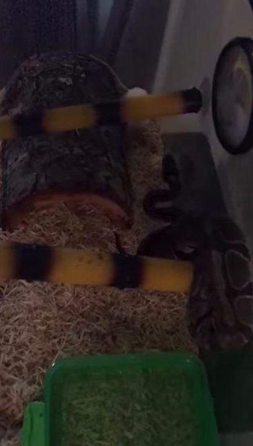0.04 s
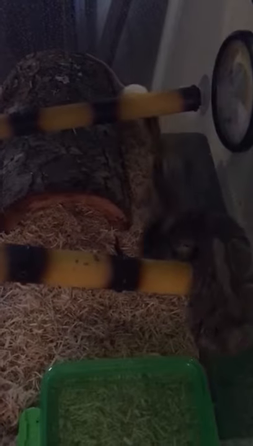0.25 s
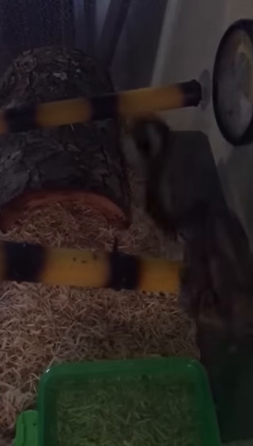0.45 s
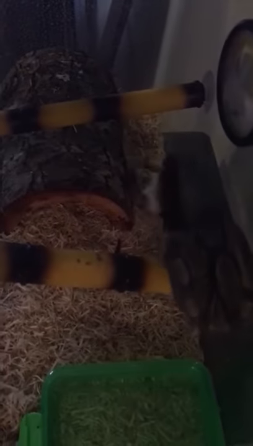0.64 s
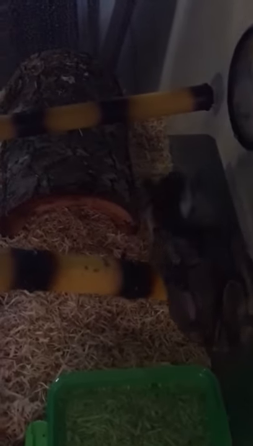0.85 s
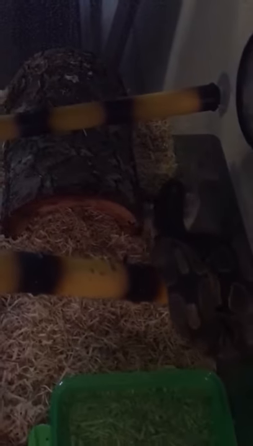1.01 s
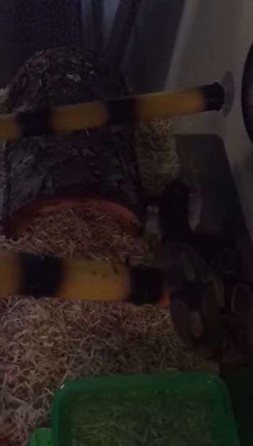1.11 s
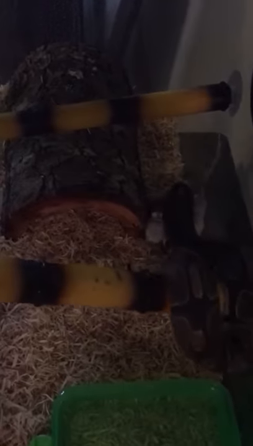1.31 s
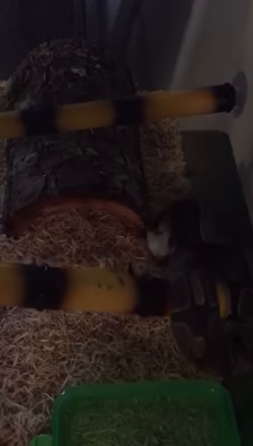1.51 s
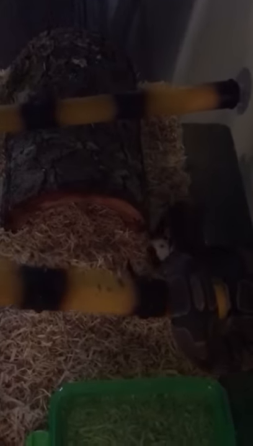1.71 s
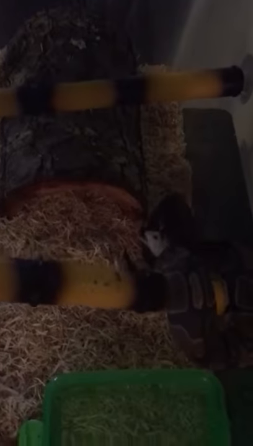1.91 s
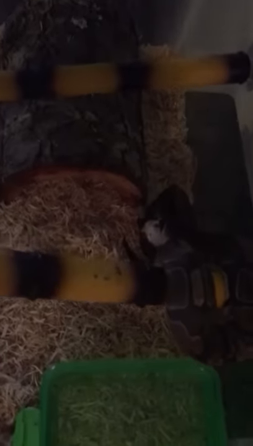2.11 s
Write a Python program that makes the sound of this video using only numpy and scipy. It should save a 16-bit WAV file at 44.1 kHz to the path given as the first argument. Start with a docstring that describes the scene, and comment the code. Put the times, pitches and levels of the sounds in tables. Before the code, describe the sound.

A snake scuffles with a small rodent in a tank, with thumps, knocks and a squeak.

```python
"""A dull thump comes first: a snake strikes at a small rodent and lands on the floor of its tank.
The struggle knocks against the walls and the hide, and the seized rodent yelps and squeaks.
Wood shavings rustle and snap under the dragging body, then settle as the coils tighten.
One microphone, close to the tank, in a quiet room with a low rumble."""
import sys
import numpy as np
from scipy import signal
from scipy.fft import rfft, irfft, next_fast_len
from scipy.io import wavfile

SR = 44100
rng = np.random.default_rng(int(sys.argv[2]) if len(sys.argv) > 2 else 0)


def generate_wav(sig):
    """Save sig (samples, or channels by samples) to the path in sys.argv[1] as 16-bit PCM at SR."""
    pcm = np.round(np.clip(np.atleast_2d(sig).T, -1, 1) * 32767).astype(np.int16)
    wavfile.write(sys.argv[1], SR, pcm)


N = 94815
T = np.arange(N) / SR
CUTOFF_HZ = 10450

# The body landing on the padded tank floor, up close: t/s, level/dB, f/Hz, swell/s
BODY_LANDINGS = [(0.2010, -23, 208, 0.0071), (0.256, -32, 196, 0.0035), (0.271, -29.5, 201, 0.0085),
                 (0.288, -33, 183, 0.009), (0.318, -41.5, 164, 0.0079), (0.368, -46, 210, 0.0033),
                 (0.44, -64, 276, .005), (0.457, -46.5, 308, 0.0021), (0.491, -41.5, 238, .006),
                 (0.577, -36, 207, 0.0039), (0.593, -44.5, 238, 0.003), (0.725, -35.5, 228, 0.0034),
                 (0.781, -37, 217, 0.0038), (0.821, -39, 178, 0.0079), (0.862, -45, 244, 0.0035),
                 (0.945, -38.5, 194.4, 0.0062), (0.966, -37.5, 202, 0.003), (1.19, -39, 208, 0.002),
                 (1.207, -41, 188, 0.012), (1.499, -53.5, 227, 0.0052), (1.535, -45.5, 192.5, 0.0042)]
# The floor's ring: multiple of f, relative level/dB, t60/s, multiple of the swell
FLOOR_MODES = [(1.0, 0, 0.063, 1.05), (.8, -17.5, 0.17, 2.6), (1.5, -19, 0.11, 1.0),
               (2.95, -27.5, 0.095, 0.7)]


def body_thumps(hold_share=0.44):
    """Soft blows swell, press for a share of the swell time and leave the floor's low modes ringing."""
    out, t = np.zeros(N), T[:SR // 4]
    for start, db, hz, swell_s in BODY_LANDINGS:
        for ratio, mode_db, t60, stretch in FLOOR_MODES:
            rise = np.clip(t / (swell_s * stretch), 0, 1) ** 2
            since_release = np.maximum(t - swell_s * (stretch + hold_share), 0)
            envelope = rise * decay(since_release, t60)
            add(out, start, from_db(db + mode_db) * envelope * np.sin(2 * np.pi * hz * ratio * t))
    return out


# Where a knock's colour is set: f/Hz
COLOUR_HZ = [400, 1500, 3500, 8000]
# Knocks on the walls and the hide; the spot that is hit sets the colour and one leading ring:
# t/s, level/dB at each of the four COLOUR_HZ, ring f/Hz, ring level/dB, ring t60/s
TANK_KNOCKS = [(0.2055, -57, -56.5, -49, -60, 630, -59, .06), (0.28, -45, -47.5, -57, -71, 940, -44, 0.055),
               (0.423, -46.5, -47.5, -40, -44, 2340, -43, 0.044),
               (0.6557, -55, -39.5, -38.5, -47.5, 1610, -40, 0.11),
               (0.6574, -57, -52, -47, -52, 2472, -34, 0.028),
               (0.709, -58, -64, -67, -67, 2480, -54.5, 0.08),
               (0.7802, -53.5, -43.5, -40, -54.5, 1850, -47.5, 0.064),
               (0.812, -56, -59, -63, -65, 2470, -48.5, 0.058),
               (0.9436, -44, -46.5, -45, -55, 1448, -33, 0.057),
               (0.948, -43, -38, -57, -69, 406.7, -31, 0.081),
               (0.968, -44, -60, -53, -66, 1105, -54, 0.042), (1.19, -55.5, -52, -63, -66, 920, -51, 0.068),
               (1.206, -50, -55, -54.5, -64, 400, -57, 0.066),
               (2.1063, -70, -56.5, -82, -62, 920, -50, .04)]
# The tank's ring: f/Hz, level/dB relative to the colour, t60/s
TANK_MODES = [(402.6, 0.5, 0.14), (660.4, -14.5, 0.3), (923.5, -5, 0.11), (1108, -6.5, 0.088),
              (1448, -4.5, 0.078), (1610, -6, 0.081), (1850, -8, 0.067), (2360, -7, .035),
              (2480, -22, 0.014), (2690, -16.5, 0.043), (3104, -4.5, .035), (3630, -11.5, 0.024),
              (4450, -7.5, 0.042)]


def tank_knocks(rise_s=0.0019, ring_rise_cycles=2, scatter_gain=0.53):
    """Hard contacts ring the tank over a short scatter of reflections; a faint tail hangs in the room."""
    out, t = np.zeros(N), T[:SR // 3]
    edges = np.geomspace(280, 11000, 11)
    for start, *levels, lead_hz, lead_db, lead_t60 in TANK_KNOCKS:
        colour = list(zip(COLOUR_HZ, levels))
        modes = [(lead_hz, lead_db, lead_t60)]
        for hz, db, t60 in TANK_MODES:
            if abs(hz / lead_hz - 1) > 0.05:  # the leading ring stands in for modes next to it
                modes.append((hz, db + db_at(colour, hz), t60))
        for k, (hz, db, t60) in enumerate(modes):
            envelope = burst(t, rise_s + ring_rise_cycles / hz, t60)
            add(out, start, (-1) ** k * from_db(db) * envelope * np.sin(2 * np.pi * hz * t))
        for low, high in zip(edges, edges[1:]):
            hz = np.sqrt(low * high)
            band = signal.butter(2, [low, high], "band", fs=SR, output="sos")
            scatter = unit_rms(signal.sosfilt(band, rng.standard_normal(len(t))))
            envelope = burst(t, rise_s, t60=0.05 * (1500 / hz) ** 0.14)  # treble dies sooner
            add(out, start, scatter_gain * from_db(db_at(colour, hz)) * envelope * scatter)
    return wall_echoes(out, echo_db=-15.5, t60=0.35)


# The rodent as it is seized, inside the tank: t/s, f/Hz, level/dB, t60/s
YELPS = [(0.423, 1710, -28.5, 0.026), (0.44, 1750, -47.5, 0.067)]
# Its voice: harmonic number, relative level/dB
YELP_HARMONICS = [(1, 3.5), (2, -1), (3, -7)]


def rodent_yelps(rise_s=0.0052, jitter=0.031):
    """Two clipped chirps, hoarse from their unsteady pitch, just before the squeak."""
    out, t = np.zeros(N), T[:SR // 10]
    for start, hz, db, t60 in YELPS:
        pitch = hz * (1 + jitter * drift(rate_hz=170)[:len(t)])
        phase = 2 * np.pi * np.cumsum(pitch) / SR
        voice = sum(from_db(line_db) * np.sin(k * phase) for k, line_db in YELP_HARMONICS)
        add(out, start, from_db(db) * burst(t, rise_s, t60) * voice)
    return out


# The course of the squeak, inside the tank: t/s, f/Hz, level/dB
SQUEAK_CONTOUR = [(0.444, 4380, -57), (0.4489, 4283, -39), (0.456, 4346, -40), (0.46, 4147, -40.5),
                  (0.464, 4213, -35.5), (0.466, 4060, -38.5), (0.471, 3770, -38), (0.474, 3720, -43),
                  (0.478, 3980, -46), (0.481, 4100, -68)]
# Its cycles alternate, giving lines between the harmonics: multiple of f, relative level/dB
SQUEAK_LINES = [(.5, -13.5), (1, 0), (1.5, -17.5), (2, -16), (2.5, -31)]
# Air rasping through the cry: f/Hz, relative level/dB
RASP_SPECTRUM = [(1000, -24), (2000, -18), (3700, -7), (4700, -4), (5800, -2), (7000, -11), (8500, 16.5),
                 (9800, 7), (11000, -1)]


def rodent_squeak(jitter=0.0082, shimmer_db=2.5, rasp_db=-13.5):
    """One short, falling cry, rough in pitch and level, with a rasp of air."""
    times, hz, db = np.transpose(SQUEAK_CONTOUR)
    pitch = np.interp(T, times, hz) * (1 + jitter * drift(rate_hz=370))
    phase = 2 * np.pi * np.cumsum(pitch) / SR
    level = from_db(np.interp(T, times, db) + shimmer_db * drift(rate_hz=1050))
    sounding = (T > times[0]) * (T < times[-1])
    voice = sum(from_db(line_db) * np.sin(k * phase) for k, line_db in SQUEAK_LINES)
    return level * sounding * (voice + from_db(rasp_db) * noise(RASP_SPECTRUM))


# Single shavings breaking, close to the microphone: t/s, level/dB, t60/s, brightest f/Hz
SHAVING_SNAPS = [(0.243, -69, 0.05, 4500), (0.257, -52, 0.021, 2800), (0.266, -56, .03, 8000),
                 (0.283, -56, .02, 8300), (0.307, -49, 0.035, 4040), (0.313, -39, 0.039, 8900),
                 (0.359, -45, 0.048, 9600), (0.369, -49, 0.14, 6570), (0.81, -48.5, 0.032, 7000),
                 (0.959, -54.5, 0.069, 9300), (0.969, -53, 0.022, 8360), (1.104, -64, 0.03, 3780),
                 (1.15, -57.5, 0.017, 7320), (1.42, -64.5, 0.18, 8300), (1.469, -63, 0.053, 4200),
                 (1.51, -66, 0.13, 3620), (1.67, -65, 0.043, 5000), (1.76, -61.5, 0.039, 1900),
                 (1.789, -69, 0.019, 8000), (2.107, -57, 0.0098, 4440)]


def shaving_snaps(rise_s=0.00079, width_octaves=0.18, broadband_db=-3):
    """Each breaking shaving gives a short crack with one bright resonance."""
    out, t = np.zeros(N), T[:SR // 10]
    hz = np.fft.rfftfreq(len(t), 1 / SR) + 1
    for start, db, t60, peak_hz in SHAVING_SNAPS:
        resonance = np.exp(-0.5 * (np.log2(hz / peak_hz) / width_octaves) ** 2)
        colour = resonance + from_db(broadband_db) * (hz < CUTOFF_HZ)
        crack = unit_rms(irfft(rfft(rng.standard_normal(len(t))) * colour))
        add(out, start, from_db(db) * burst(t, rise_s, t60) * crack)
    return out


# How hard the bedding is stirred: t/s, level/dB
STIRRING = [(0.0, -79), (0.19, -76), (0.235, -62), (0.262, -47), (0.30, -56.5), (0.338, -61.5),
            (0.375, -52), (0.405, -59.5), (0.455, -50.5), (0.478, -55.5), (0.495, -53), (0.545, -60.5),
            (0.575, -54), (0.625, -61), (0.65, -56.5), (0.69, -61.5), (0.715, -52.5), (0.75, -62),
            (0.82, -60.5), (0.88, -66.5), (1.0, -69), (1.15, -72.5), (1.36, -71), (1.43, -71.5),
            (1.455, -71), (1.515, -64), (1.56, -72.5), (1.76, -72), (1.87, -74.5), (2.15, -75.5)]
# Wood shavings at close range: f/Hz, relative level/dB
SHAVINGS_SPECTRUM = [(300, 16), (500, 3), (950, 4.5), (1300, 1.5), (1700, 3.5), (2100, 2.5), (2450, 0),
                     (2900, 1), (4300, 0.5), (5500, -1.5), (8000, -6), (9500, -1.5), (11000, -28)]


def shavings_rustle(clicks_per_s=4000, spread_db=5, ring_cycles=19, crackle_db=-6, slide_db=-2.5):
    """Many tiny shavings click and ring over the smooth hiss of sliding scales."""
    sizes = from_db(spread_db * np.minimum(rng.exponential(1, N), 4))
    signs = rng.choice([-1, 1], N)
    clicks = sizes * signs * (rng.random(N) < clicks_per_s / SR)
    pitches = np.geomspace(900, 10200, 24)
    pitch_index = rng.integers(0, len(pitches), N)
    crackle = np.zeros(N)
    for k, hz in enumerate(pitches):
        radius = decay(1 / SR, t60=ring_cycles / hz)
        resonator = [1, -2 * radius * np.cos(2 * np.pi * hz / SR), radius ** 2]
        ring = signal.lfilter([1, 0, -1], resonator, clicks * (pitch_index == k) + 1e-18)
        crackle += hz * from_db(db_at(SHAVINGS_SPECTRUM, hz)) * ring
    slide = from_db(slide_db) * noise(SHAVINGS_SPECTRUM)
    return from_db(over_time(STIRRING)) * (from_db(crackle_db) * unit_rms(crackle) + slide)


# The heavy body on the tank floor, beneath the rustle: f/Hz, relative level/dB
DRAG_SPECTRUM = [(70, -32.5), (150, 5), (220, -4.5), (330, -4), (480, -16.5), (1000, -16.5), (2000, -35)]


def body_drag(level_db=-52.5, at_stir_db=-55.5, follow=0.69):
    """The body's weight scuffs dully over the floor, rising and falling with the stirring."""
    swing_db = follow * (over_time(STIRRING) - at_stir_db)
    return from_db(level_db + swing_db) * noise(DRAG_SPECTRUM)


def wall_echoes(sound, echo_db, t60):
    """A wash of reflections from the walls follows the direct sound to the microphone."""
    t = T[:SR // 3]
    echoes = rng.standard_normal(len(t)) * burst(t, rise_s=0.0029, t60=t60)
    echoes /= np.linalg.norm(echoes)
    return sound + from_db(echo_db) * signal.fftconvolve(sound, echoes)[:N]


# The quiet room around the tank: f/Hz, relative level/dB
ROOM_SPECTRUM = [(20, -27.5), (40, -5), (60, 3.5), (80, 0), (110, -2), (160, -7.5), (220, -16.5),
                 (320, -22), (480, -28), (630, -23.5), (1000, -27), (1550, -26.5), (2700, -42.5),
                 (5000, -44.5), (9000, -45.5), (10800, -64)]
# Its low rumble, in the background: t/s, relative level/dB
RUMBLE_SWELLS = [(0.0, -7), (0.16, 1.5), (0.22, 5.5), (0.34, 2), (0.5, -3.5), (0.95, 1), (1.25, -1),
                 (1.34, 4.5), (1.45, 2), (1.72, -1.5), (1.85, 5), (1.98, -3.5), (2.15, 3)]


def room_tone(level_db=-54, rumble_top_hz=139):
    """Steady hiss over a low rumble that swells and sinks."""
    air = noise(ROOM_SPECTRUM)
    rumble = signal.sosfiltfilt(signal.butter(3, rumble_top_hz, fs=SR, output="sos"), air)
    hiss = air - rumble
    return from_db(level_db) * (hiss + rumble * from_db(over_time(RUMBLE_SWELLS)))


def from_db(db):
    """Decibels to gain."""
    return 10 ** (np.asarray(db) / 20)


def unit_rms(x):
    """Scale to an rms of 1."""
    return x / np.sqrt(np.mean(x ** 2) + 1e-20)


def db_at(spectrum, hz):
    """Read a spectrum on a log-frequency axis."""
    freqs, db = np.transpose(spectrum)
    return np.interp(np.log(hz + 1e-3), np.log(freqs), db)


def over_time(points):
    """Join (time, value) points into one value per sample."""
    return np.interp(T, *np.transpose(points))


def noise(spectrum):
    """Noise with the given spectrum, rms 1."""
    size = next_fast_len(N)
    gains = from_db(db_at(spectrum, np.fft.rfftfreq(size, 1 / SR)))
    return unit_rms(irfft(rfft(rng.standard_normal(size)) * gains)[:N])


def drift(rate_hz):
    """Smooth random wander, rms 1."""
    lowpass = signal.butter(2, rate_hz, fs=SR, output="sos")
    return unit_rms(signal.sosfilt(lowpass, rng.standard_normal(N)))


def decay(t, t60):
    """Fall by 60 dB every t60 seconds."""
    return np.exp(-np.log(1000) * t / t60)


def burst(t, rise_s, t60):
    """A smooth rise and an exponential decay."""
    return np.sin(np.pi / 2 * np.clip(t / rise_s, 0, 1)) ** 2 * decay(t, t60)


def add(out, start_s, sound):
    """Mix a sound in at its start time."""
    i = int(start_s * SR)
    out[i:i + len(sound)] += sound[:N - i]


def scene():
    """The struggle in the tank, close and in mono, with the room behind it."""
    scuffle = wall_echoes(shavings_rustle() + rodent_yelps() + rodent_squeak(), echo_db=-8, t60=0.021)
    return (body_thumps() + body_drag() + tank_knocks() + shaving_snaps() + scuffle + room_tone())[None]


def record(dry):
    """The microphone's signal, with the top treble cut steeply."""
    return signal.sosfilt(signal.ellip(8, 0.5, 60, CUTOFF_HZ, fs=SR, output="sos"), dry)


dry = scene()
out = record(dry)
generate_wav(out)
```